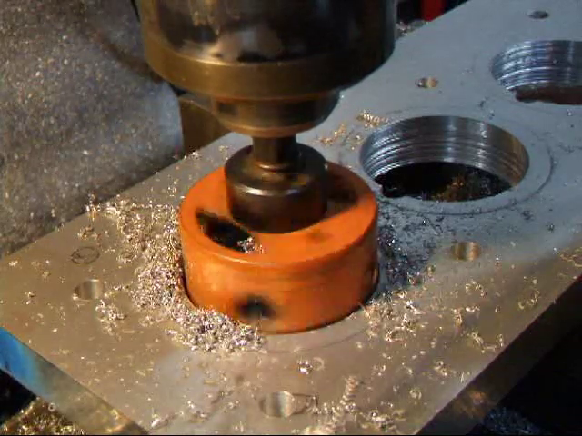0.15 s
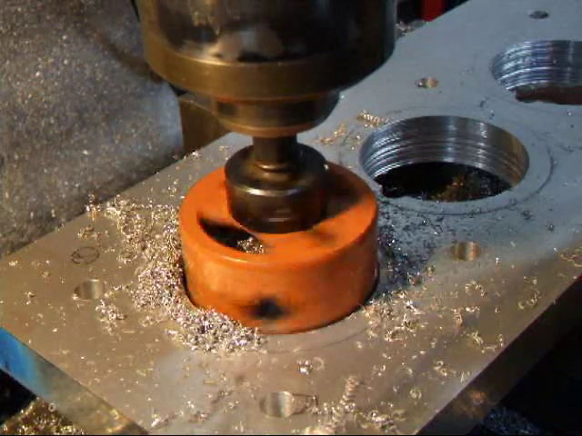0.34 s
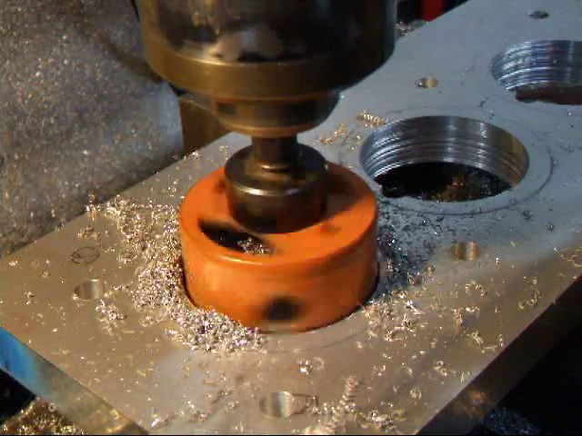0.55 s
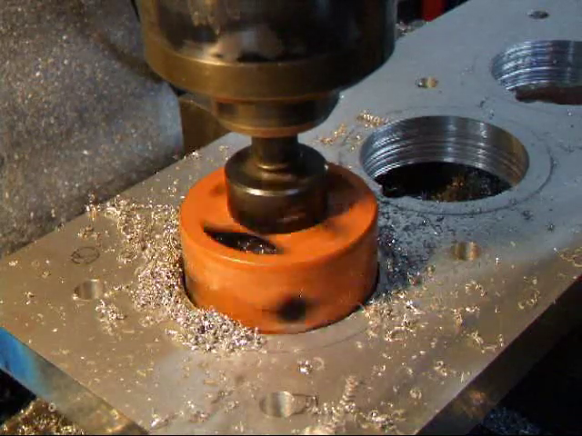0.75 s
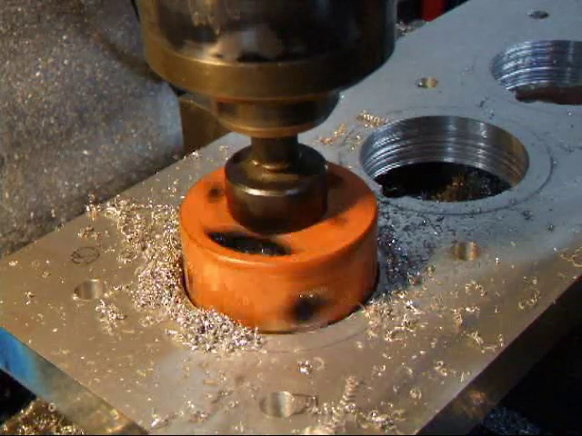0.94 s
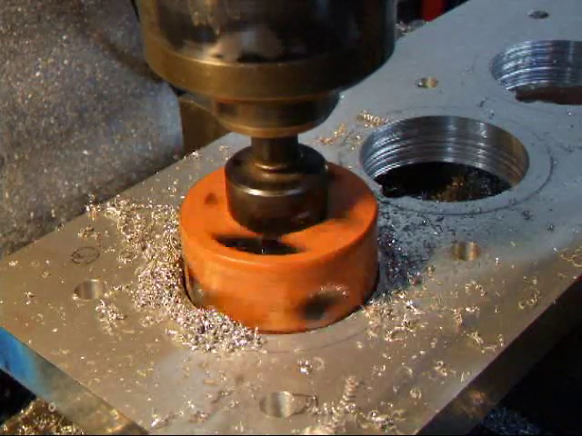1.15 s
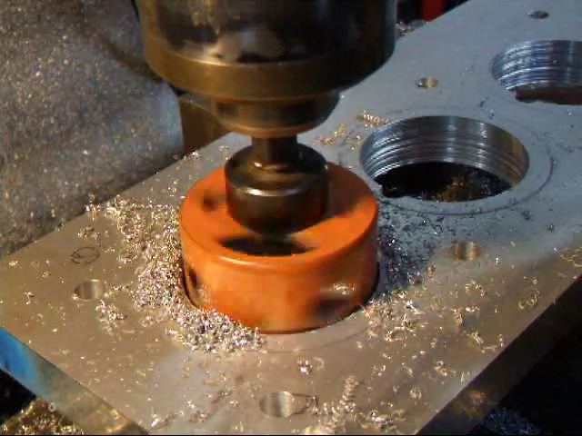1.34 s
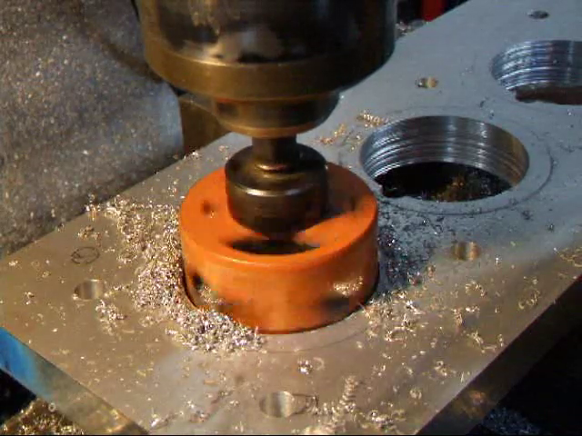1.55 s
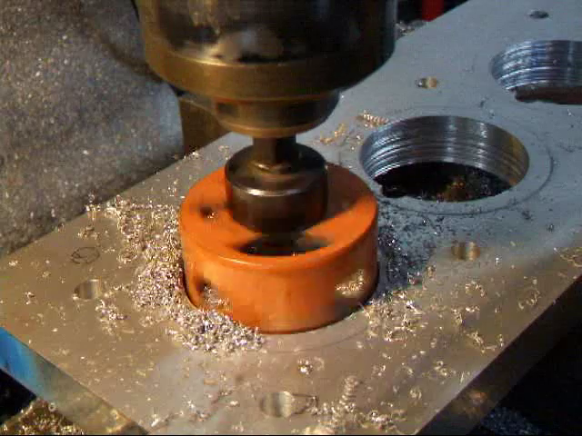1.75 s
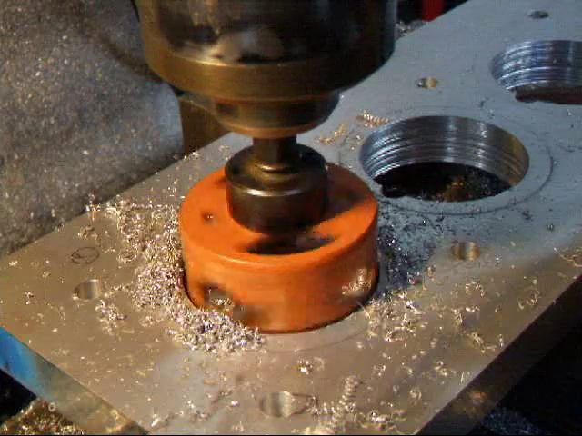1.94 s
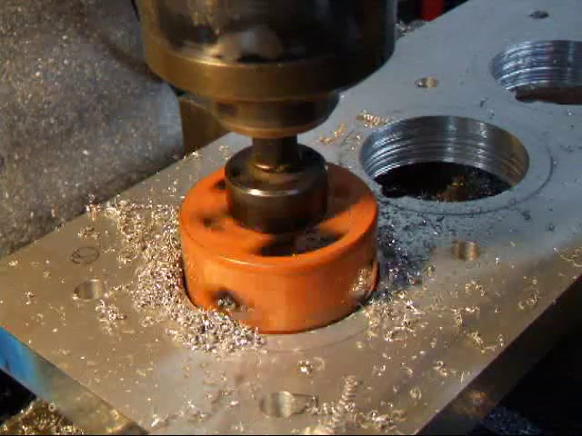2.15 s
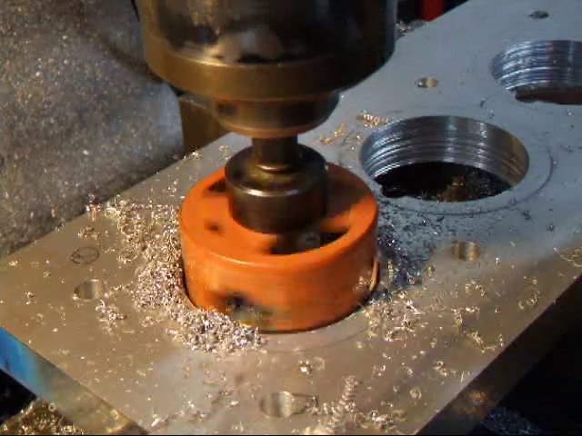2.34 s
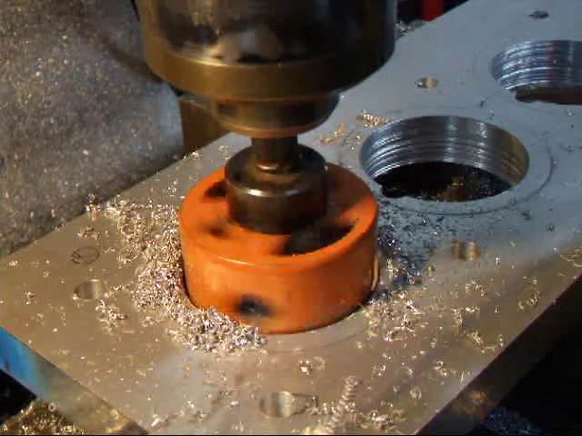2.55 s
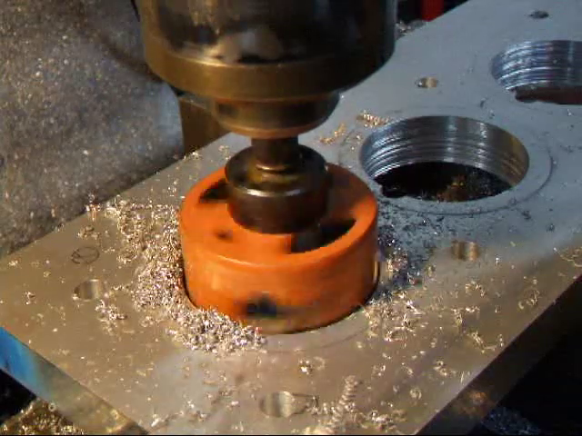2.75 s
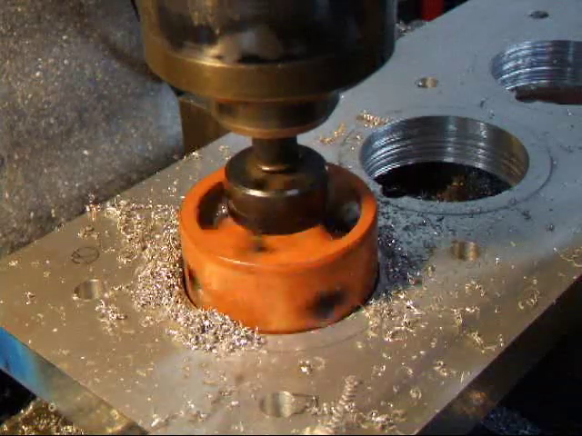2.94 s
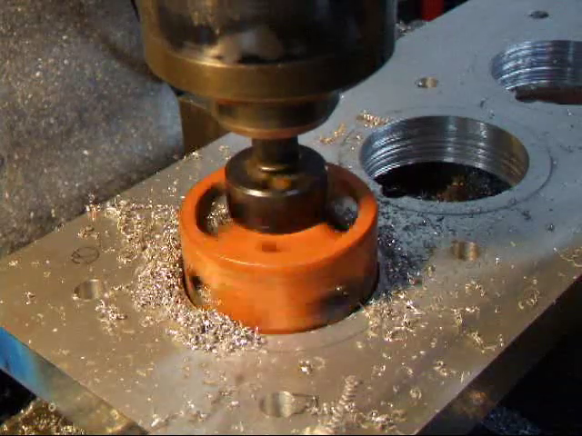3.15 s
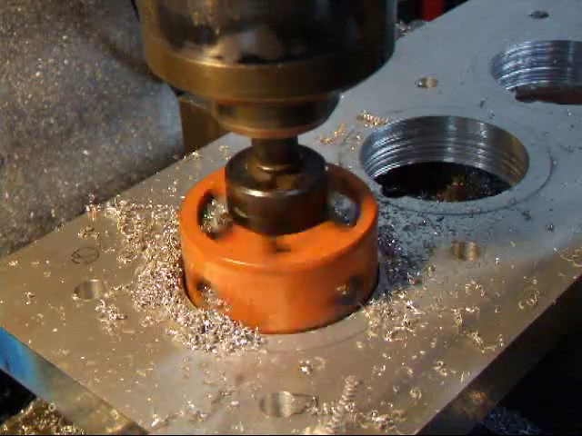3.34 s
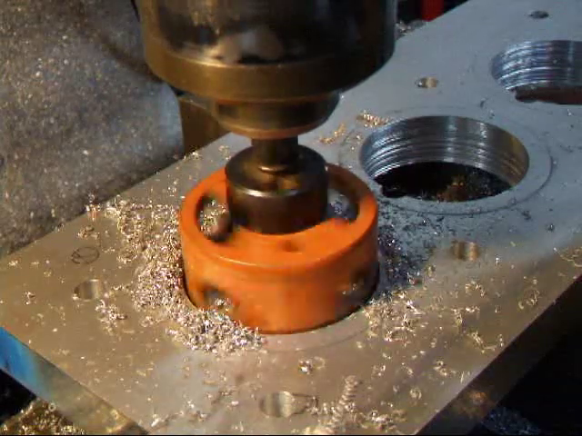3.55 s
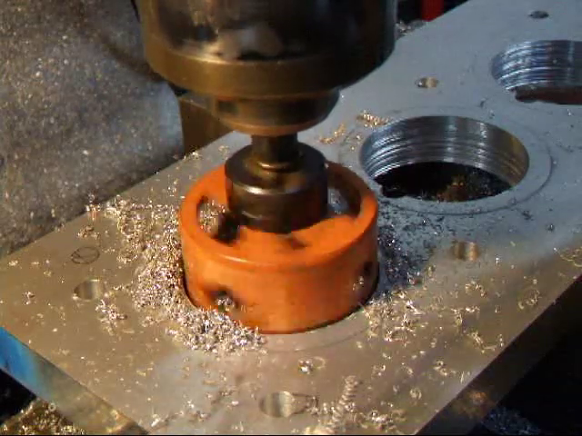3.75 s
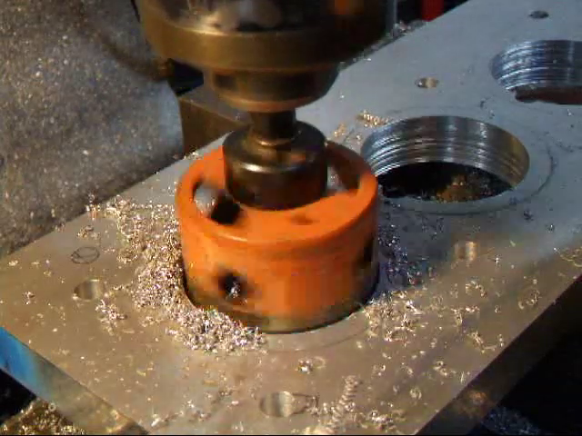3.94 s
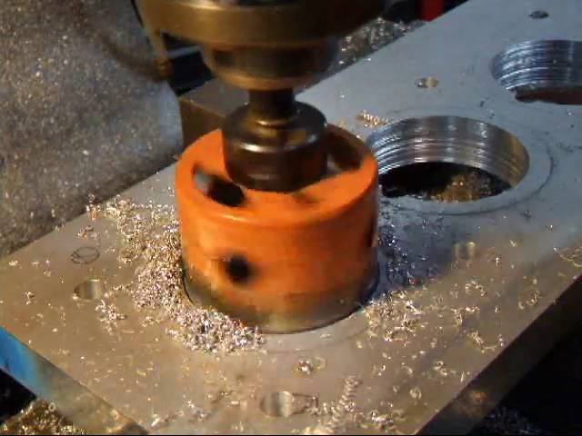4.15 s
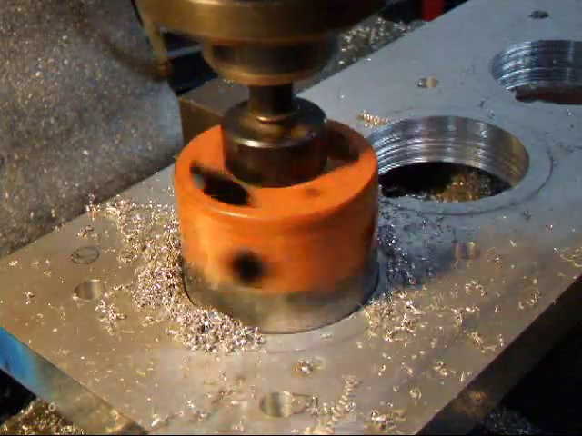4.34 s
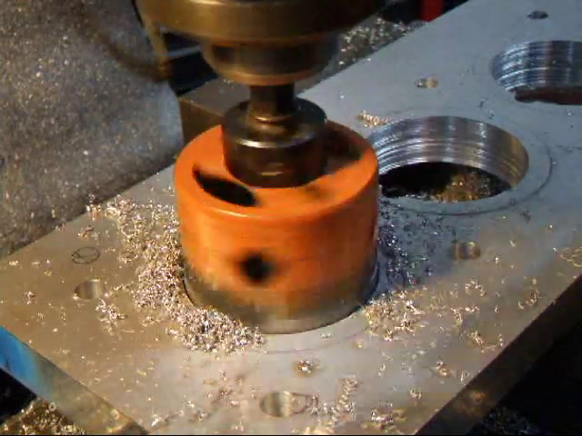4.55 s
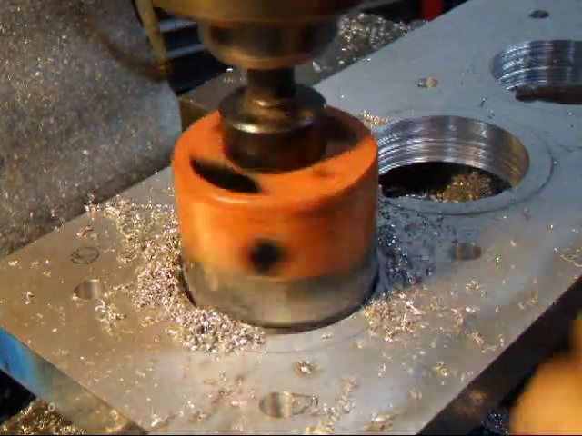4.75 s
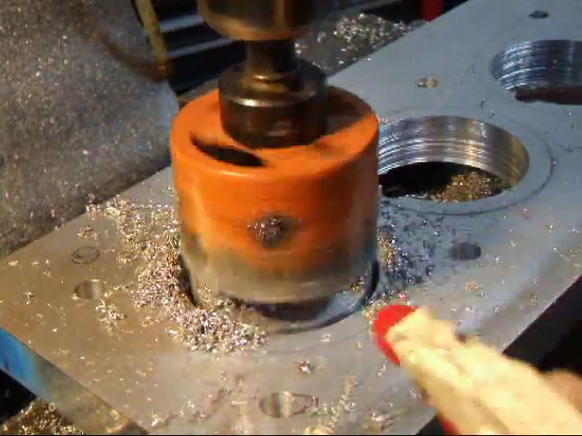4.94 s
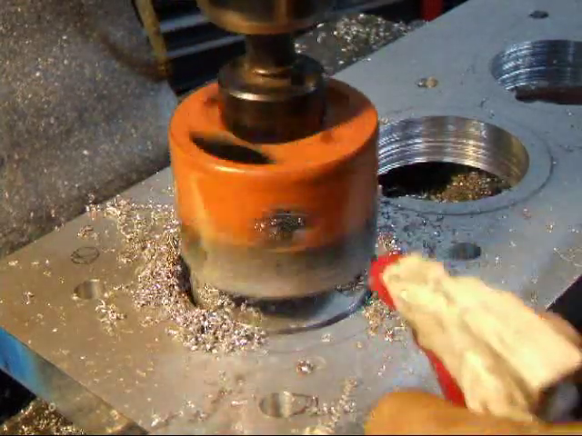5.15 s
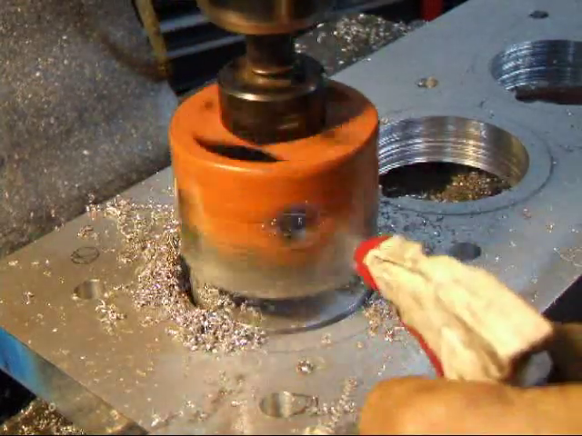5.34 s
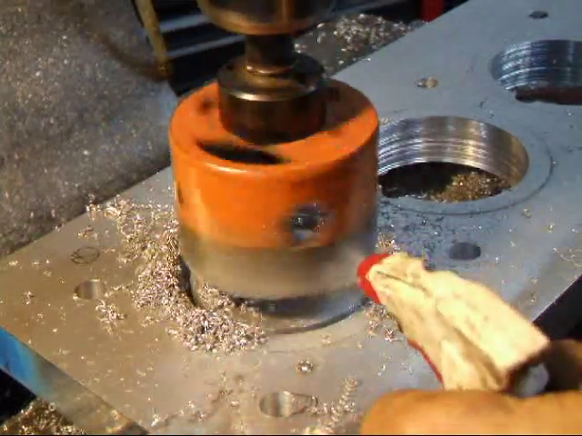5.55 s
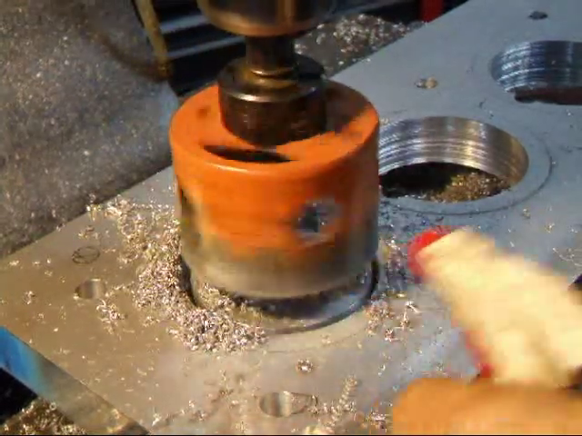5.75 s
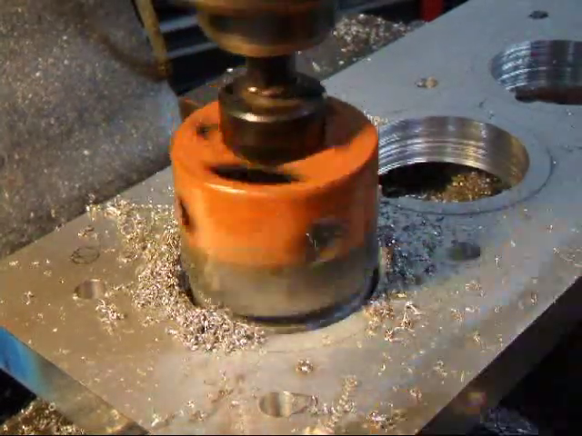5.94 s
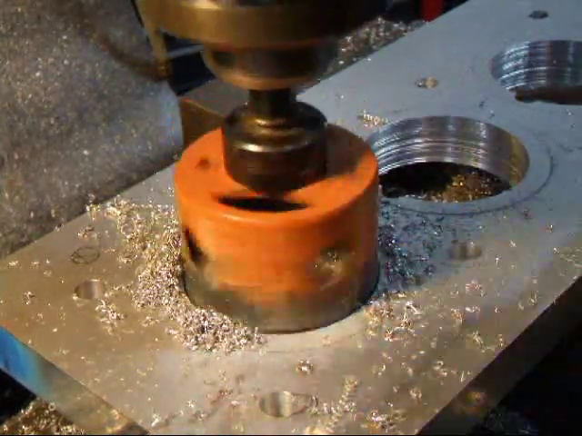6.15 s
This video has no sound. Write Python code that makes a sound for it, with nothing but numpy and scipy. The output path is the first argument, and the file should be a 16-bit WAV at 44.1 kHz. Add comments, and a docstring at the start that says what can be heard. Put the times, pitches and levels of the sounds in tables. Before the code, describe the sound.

A hole saw on a milling machine cuts metal plate, heard close and nearly dry in a workshop. From 0 to about 3.8 seconds the teeth catch in separate bites, at roughly 0.1, 0.5, 0.9, 1.3, 1.7, 2.2, 2.6, 3.0 and 3.4, with a weak last one near 3.7. Each starts abruptly as a loud, raspy buzz around 430 pulses a second with bright steel ringing, then turns ragged and grinding, rising slightly in pitch as it lets go into a short hum. The bite at 1.3 is rougher, growling, with a brief squawk and chip snag near 1.45. After 3.75 the saw lifts; hard clinks come at 4.1, 4.2 and 4.45, with faint squeaks around them. The drive's whine, throbbing about eleven times a second over a coloured rattle, swells and continues alone, with one more light clink near 6.2.

```python
"""A hole saw on a milling machine cuts thick steel plate, close by in a workshop. Its teeth bite again
and again, and the cup chatters by stick-slip some 430 times a second: pulses ring its resonances.
Grains of noise make tearing chips and grinding. Then the saw is lifted and clinks and squeaks in its
groove, while the recorder's gain recovers and brings up the drive: whining tones that throb with the
shaft, over a coloured rattle."""
import sys
import numpy as np
from scipy import signal
from scipy.fft import rfft, irfft, next_fast_len
from scipy.io import wavfile
from scipy.ndimage import uniform_filter1d, minimum_filter1d

SR = 44100
rng = np.random.default_rng(int(sys.argv[2]) if len(sys.argv) > 2 else 0)


def persist_wave(psi):
    """Save psi, clipped to +-1, as 16-bit WAV."""
    counts = np.round(np.clip(psi, -1, 1) * 32767).astype(np.int16)
    wavfile.write(sys.argv[1], SR, np.atleast_2d(counts).T)


N = 273861
TIME = np.arange(N) / SR  # seconds

# All levels in the tables are relative, ahead of the gains of the mix.
# Rattle and rumble spectrum of the drive. Each row: frequency in Hz, level in dB.
DRIVE_SPECTRUM = [(20, -13), (50, -21), (105, 0), (160, -2), (205, -9), (250, 0.5), (450, -2), (620, 6.5),
                  (870, 0), (1080, 4.5), (1600, -5.5), (2300, -9.5), (4000, -14), (5400, -12.5),
                  (11000, -23)]
# Tones of gears and motor. Each row: frequency in Hz, level in dB, depth of flutter at twice the
# shaft rate as a share.
GEAR_TONES = [(99.8, -44, 0.25), (261.4, -50.5, 0.1), (372.3, -39, 0.29), (502, -43.5, 0.1),
              (590, -33.5, 0.5), (647, -39.5, 1), (824, -43.5, 0.039), (925, -50, 0.25),
              (1098, -39.5, 0.86), (1510, -56, 0.1), (2405, -49.5, 0.19), (3069, -50.5, 0.19),
              (3800, -50, .5), (4770, -49.5, 0.42), (5330, -48.5, 0.53), (6481, -60, 0.35)]
WHINE_HZ, WHINE_DB = 729, -27
SHAFT_HZ = 11.08

# The rim touches the wall of the groove. Each row: time in seconds, level in dB, length in seconds,
# share of hard knock from 0 to 1.
RIM_TOUCHES = [(2.875, -27, .025, .05), (3.255, -29, .015, .05), (4.120, -20.5, .003, .95),
               (4.211, -16.5, .006, .78), (4.39, -36, .025, .2), (4.463, -24, .004, .75),
               (4.49, -40, .02, .1), (4.58, -37, .03, .25), (4.72, -43, .02, .1), (4.795, -35, .025, .15),
               (6.198, -26, .008, .6)]
# Resonances of the freed cup. Each row: frequency in Hz, width in Hz, lift in dB.
FREE_CUP_MODES = [(1680, 260, 14), (2130, 220, 11), (2600, 150, 7), (3050, 150, 5), (5450, 300, 4)]
# Squeak of the rim. Each row: frequency in Hz, width in Hz, level in dB.
RIM_SQUEAK = [(5700, 200, -10), (7560, 157, -9.5), (8360, 330, -8)]

# The teeth bite. Each row: start in seconds, hold in seconds, force in dB, sag over the hold in dB,
# release in dB per second, swing of the cup in dB, chatter pitch in Hz, time in which the regular beat
# loosens in seconds, share by which slips alternate between strong and weak.
TOOTH_BITES = [ (0.120, .160, -19, 9, 262.5, -24.5, 429, 0.054, 0.13),
               (0.487, .12, -21, 2, 105, -24, 418.4, 0.098, 0.04),
               (0.91, 0.4, -19.5, 6, 156, -25, 432.5, 0.13, 0.039),
               (1.304, .140, -22.5, 0.34, 135, -25, 432.5, 0.18, 0.93),
               (1.718, 0.27, -19.5, 6, 421.5, -25.5, 423.6, 0.19, 0.052),
               (2.162, 0.2, -18, 8.5, 191.5, -23.5, 426.9, 0.11, 0.041),
               (2.575, .250, -19, 7, 129.5, -25.5, 428.7, .14, 0.065),
               (2.980, .250, -18, 9, 140.5, -25, 430, .14, 0.055),
               (3.405, 0.17, -20, 3.5, 200.5, -28, 431.3, 0.16, 0.048),
               (3.66, 0.057, -27, 3, 173, -27, 451.6, .01, .3), ]
# Resonances of the steel cup in the cut. Each row: frequency in Hz, width in Hz, lift in dB.
CUP_MODES = [(1106, 15, 13), (1352.4, 58, 14.5), (1720, 49, 6), (2600, 190, 6), (3070, 270, 10),
             (4000, 52, 4), (4790, 130, 2), (5100, 260, 8.5), (6660, 65, 9), (9160, 120, 8)]
# Spectrum of the slips. Each row: frequency in Hz, level in dB.
SLIP_SPECTRUM = [(300, -47.5), (620, -13.5), (860, 6), (1100, -3.5), (1350, -3), (2000, -9.5), (3700, -8.5),
                 (6500, -7), (9000, -11.5), (11000, -14)]
# Spectrum of chip scraping. Each row: frequency in Hz, level in dB.
SCRAPE_SPECTRUM = [(200, -51), (380, 3.5), (620, -12), (900, -11), (1700, 6), (2300, -0.5), (4400, -1),
                   (6600, 0.5), (9300, -5), (11000, -9.5)]
# Spectrum of grinding. Each row: frequency in Hz, level in dB.
GRIND_SPECTRUM = [(300, -21.5), (650, -35), (800, 8.5), (920, 15), (1100, 4.5), (1220, 6.5), (1400, 1),
                  (1550, 2.5), (2200, -42.5)]
# Spectrum of the plate shuddering under a loose, ragged cut. Each row: frequency in Hz, level in dB.
SHUDDER_SPECTRUM = [(60, -7), (140, -6.5), (220, 5.5), (330, -4.5), (600, -1), (1500, -59)]
# Rumble of the machine under load. Each row: frequency in Hz, level in dB.
LOAD_SPECTRUM = [(20, -5), (50, -18), (100, -0.5), (135, -5), (300, -35), (1000, -50)]
# Partials of the limping swing. Each row: multiple of the pitch, level in dB.
HALF_PARTIALS = [(1.5, -11), (2.5, 0), (3.5, -7), (4.5, -3), (5.5, -11), (6.5, -8), (7.5, -10)]
# A trapped chip is dragged through the groove. Each row: time in seconds, level in dB, length in seconds.
CHIP_SNAGS = [(1.442, -20.5, 0.0034), (1.555, -35.5, 0.013), (2.806, -36, 0.011), (2.833, -25, 0.0048),
              (3.103, -24, .005), (3.241, -26.5, 0.0055), (3.674, -37, 0.011), (3.719, -27, 0.0082)]
# Released by the teeth, the cup swells into a hum. Each row: time in seconds, level in dB,
# length in seconds.
CUP_HUMS = [(.325, -28.5, 0.033), (.76, -33, 0.064), (1.577, -27, 0.029), (2.019, -28, 0.021),
            (2.415, -25, .03), (2.901, -26, 0.031), (3.271, -22, 0.029), (3.725, -27, 0.016)]
# The rim squawks as a bite lets go. One row: time in seconds, frequency in Hz, level in dB,
# length in seconds.
RIM_SQUAWK = (1.463, 1540, -22.5, .013)

FORCE_ATTACK_DB_PER_S = 1499.5  # the teeth catch at once
SWING_ATTACK_DB_PER_S = 419  # the cup needs longer to build up its swing
SWING_FOLLOW = 1.05  # dB of swing lost for each dB of force lost
FREE_HZ, GRIP_RANGE_DB = 477.7, 23  # the pitch climbs to that of the free cup as the force falls so far
IDLE_FORCE_DB, IDLE_SWING_DB = -41.5, -39.5  # the teeth skim the plate between bites
LIFT_S, LIFT_DB_PER_S = 3.753, 84.5  # the saw is raised and the contact fades


def gain_of(db):
    """Level law: decibels to amplitude."""
    return 10 ** (np.asarray(db) / 20)


def evened(x):
    """Power normalisation: scales to rms 1."""
    return x / np.sqrt(np.mean(x ** 2) + 1e-20)


def wander(hz):
    """Low-passed noise: a random drift of rms 1, no faster than about hz."""
    step = 32  # samples between drawn points
    size = next_fast_len(N // step + 2)
    f = np.fft.rfftfreq(size, step / SR)
    drift = irfft(rfft(rng.standard_normal(size)) / (1 + (f / hz) ** 4), size)
    return evened(np.interp(np.arange(N) / step, np.arange(size), drift))


def bump(at, length):
    """Gaussian envelope: swells to 1 at a moment, falling to 1/e a length away."""
    return np.exp(-((TIME - at) / length) ** 2)


def colour(x, points, peaks=(), size=4096):
    """Minimum-phase filter: a smooth spectrum with resonances standing on it; rms 1."""
    hz = np.fft.rfftfreq(size, 1 / SR)
    f, db = np.transpose(points)
    db = np.interp(np.log(hz + 1), np.log(f), db)
    for centre, width, lift in peaks:
        db = db + lift / (1 + (2 * (hz - centre) / width) ** 2)
    log_gain = np.log(gain_of(np.r_[db, db[-2:0:-1]]))
    # the phase of a causal response is the Hilbert transform of its log gain
    response = np.fft.ifft(np.exp(signal.hilbert(log_gain).conj())).real
    return evened(signal.oaconvolve(x, response)[:N])


def grains(per_s, spread_db):
    """Shot noise: random tiny impacts, a few much larger than the rest when the spread is wide."""
    size = gain_of(spread_db * np.minimum(rng.exponential(1, N), 4))
    sign = rng.choice([-1, 1], N)
    struck = rng.random(N) < per_s / SR
    return evened(size * sign * struck)


def workshop(x, t60, wet_db):
    """Early reverberation: a short, faint tail, different at each ear except in the bass."""
    t = np.arange(SR // 2) / SR
    sparse = rng.standard_normal((2, len(t))) * (rng.random((2, len(t))) < .06)
    taps = sparse * gain_of(-60 * t / t60) * (t > .002)
    taps = signal.lfilter(*signal.butter(1, 700, "high", fs=SR), taps)
    tail = taps / np.linalg.norm(taps, axis=1, keepdims=True)
    return x + gain_of(wet_db) * signal.fftconvolve(x[None], tail, axes=1)[:, :N]


def far_rattle(far_db=-44):
    """Diffuse field: the drive's rattle returns from the far walls, independent at each ear."""
    return gain_of(far_db) * np.array([colour(rng.standard_normal(N), DRIVE_SPECTRUM) for ear in "LR"])


def drive(rattle_db=-23.5, throb_db=0.3, flutter_db=-1.3):
    """Amplitude modulation: a shaft running slightly off centre makes whine, gears and rattle throb."""
    shaft = 2 * np.pi * SHAFT_HZ * (TIME - .006)
    throb, twice = np.cos(shaft), np.cos(2 * shaft)
    mesh = np.sin(2 * np.pi * WHINE_HZ * TIME + .2 * wander(7))
    whine = gain_of(WHINE_DB) * evened(mesh * (1 + .9 * throb + .3 * twice + .1 * wander(20)))
    gears = np.zeros(N)
    for hz, db, depth in GEAR_TONES:
        swell = 1 + depth * twice + .3 * wander(20)
        gears += gain_of(db) * evened(swell * np.sin(2 * np.pi * hz * TIME + 0.63 * wander(8.3)))
    # the rattle peaks twice a turn, the stronger peak a quarter turn ahead of the whine
    clatter = grains(7000, 0.55)
    beat_db = -throb_db * np.sin(shaft) + flutter_db * twice + 1.2 * wander(29)
    rattle = colour(clatter * gain_of(beat_db), DRIVE_SPECTRUM)
    return whine + gears + gain_of(rattle_db) * rattle


def touches():
    """Impact and friction: a hard touch knocks the freed cup's resonances; a light one squeaks."""
    knock_spectrum = [(300, 1), (1400, -9.5), (4000, -8.5), (8000, -14.5), (11000, -20.5)]  # Hz, dB
    knock = colour(grains(7900, 0.61), knock_spectrum, FREE_CUP_MODES)
    squeak = np.zeros(N)
    for hz, width, db in RIM_SQUEAK:
        squeak += gain_of(db) * wander(width / 2) * np.sin(2 * np.pi * hz * TIME)
    squeak = evened(squeak)
    out = np.zeros(N)
    for at, db, length, hard in RIM_TOUCHES:
        hard = np.clip(hard, 0, 1)
        out += gain_of(db) * bump(at, length) * evened(hard * knock + (1 - hard) * squeak)
    return out


def bite_db(start, hold, sag_db, release, attack):
    """Envelope of one bite below its peak, in dB: a quick attack, a sagging hold, a release."""
    t = TIME - start
    sag = sag_db * np.clip(t / hold, 0, 1)
    return attack * np.minimum(t, 0) - sag - release * np.maximum(t - hold, 0)


def feed():
    """Contact loading of teeth and cup: the harder the grip, the lower the chatter pitch."""
    contact_db = -LIFT_DB_PER_S * np.maximum(TIME - LIFT_S, 0)
    force_db, sway_db = IDLE_FORCE_DB + contact_db, IDLE_SWING_DB + contact_db
    drop_hz = np.zeros(N)
    for start, hold, peak_db, sag_db, release, swing_db, hz, _, _ in TOOTH_BITES:
        grip_db = bite_db(start, hold, sag_db, release, FORCE_ATTACK_DB_PER_S)
        swing_shape_db = bite_db(start, hold, sag_db, release, SWING_ATTACK_DB_PER_S)
        force_db = np.maximum(force_db, peak_db + grip_db)
        sway_db = np.maximum(sway_db, swing_db + SWING_FOLLOW * swing_shape_db)
        drop_hz = np.maximum(drop_hz, (FREE_HZ - hz) * np.clip(1 + grip_db / GRIP_RANGE_DB, 0, 1))
    force = gain_of(uniform_filter1d(force_db, size=220))
    hums = sum(gain_of(db) * bump(at, length) for at, db, length in CUP_HUMS)
    return force, np.hypot(gain_of(sway_db), hums), FREE_HZ - drop_hz, gain_of(contact_db)


def regularity():
    """Phase locking: each bite starts a regular beat that loosens; limp is its strong-weak alternation."""
    locks = []
    for at, *_, loosen, _ in TOOTH_BITES:
        locks.append((TIME > at) * bump(at, loosen))
    lock = np.max(locks, axis=0)
    limp = np.array([row[-1] for row in TOOTH_BITES]) @ np.array(locks)
    return lock, np.clip(limp + .3 * (1 - lock), 0, 1)


def load_rumble(contact, loose):
    """Forced vibration: the machine under load adds a low rumble, scaled by contact and looseness."""
    return colour(rng.standard_normal(N), LOAD_SPECTRUM) * contact * loose


def shuddering(groove, limp, loose):
    """Forced plate vibration: a loose, ragged cut shakes the plate in its low range."""
    return colour(grains(3000, 2.5), SHUDDER_SPECTRUM) * groove * limp * loose ** .5


def chip_spurts(turns, loose, clump_db=1.5):
    """Modulated tearing: chips spurt after each slip, and come in clumps as teeth catch."""
    return (3.0 + np.exp(-(turns % 1) / 1.8)) * gain_of(clump_db * loose * wander(70))


def grinding(spurts, groove, lock):
    """Resonant excitation: grinding grains drive the cup's modes, weaker while the beat is regular."""
    return colour(grains(3000, 2.5) * spurts, GRIND_SPECTRUM, CUP_MODES) * groove * (1 - .8 * lock)


def chip_scraping(spurts, force, lock, contact, rub_db=-42):
    """Fracture and friction: chips tear, snag and rub the wall, weakly ringing the cup's modes."""
    half_lifted = [(hz, width, .5 * lift) for hz, width, lift in CUP_MODES]
    scrape = colour(grains(6000, 3.2) * spurts, SCRAPE_SPECTRUM, half_lifted)
    tearing = force * (1 - .5 * lock)
    rub = gain_of(rub_db) * contact  # the wall still rubs between bites, until the saw is lifted
    snags = sum(gain_of(db) * bump(at, length) for at, db, length in CHIP_SNAGS)
    return scrape * (np.hypot(tearing, rub) + snags)


def squawk():
    """Friction-driven tone: the rim squawks briefly at an unsteady pitch."""
    at, hz, db, length = RIM_SQUAWK
    tone = evened(np.sin(2 * np.pi * hz * TIME + 0.82 * wander(60)))
    return gain_of(db) * bump(at, length) * tone


def ringing(force, lock):
    """Resonance: while the beat is regular it pumps the cup's high modes, which sing out."""
    ring = np.zeros(N)
    for hz, width, lift in CUP_MODES[3:-1]:
        swell = 1 + .5 * wander(40)
        tone = np.sin(2 * np.pi * hz * TIME + 1.7 * wander(width / 3))
        ring += gain_of(lift) * swell * tone
    return evened(ring) * force * lock


def growl(turns, force, limp, loose):
    """Period doubling: alternating strong and weak swings put growling partials in between."""
    halves = np.zeros(N)
    for multiple, db in HALF_PARTIALS:
        halves += gain_of(db) * np.sin(2 * np.pi * multiple * turns + (.6 + loose) * wander(30))
    return evened(halves) * force * limp


def swing_overtones(turns, force, lock):
    """Harmonic distortion: the lopsided swing has second and third partials."""
    second = np.sin(4 * np.pi * turns) * (1 + .6 * wander(45))
    third = .85 * np.sin(6 * np.pi * turns) * (1 + .7 * wander(40))
    return evened(second + third) * force * (.8 + .2 * lock)


def swinging(turns, sway, loose):
    """Torsional oscillation: the cup twists to and fro, less steadily in a loose cut."""
    return evened(np.sin(2 * np.pi * turns) * (1 + (.14 + .32 * loose) * wander(45))) * sway


def disperse(x, delay):
    """Dispersion: bending waves in steel run faster when high; clicks smear, by delay seconds at 1 kHz."""
    khz = np.fft.rfftfreq(N, 1 / SR) / 10 ** 3
    return irfft(rfft(x) * np.exp(-4j * np.pi * delay * 10 ** 3 * np.sqrt(khz)), N)


def slip_train(turns, loose, limp, uneven=0.35):
    """Stick-slip: one slip a swing, of uneven strength; a loose cut makes them early and late."""
    at = np.flatnonzero(np.diff(np.floor(turns)))
    late, size = rng.standard_normal((N, 2))[:len(at)].T
    late = late * (.015 + .2 * loose[at] ** 2) / 1000  # milliseconds to seconds
    weak = np.arange(len(at)) % 2  # every second slip
    moment = np.clip(at + np.round(late * SR).astype(int), 0, N - 1)
    slips = np.zeros(N)
    slips[moment] = np.exp(uneven * size) * (1 + limp[at] * (1 - 2 * weak))
    return disperse(slips, delay=.004)


def slipping(turns, force, lock, limp):
    """Impulse response: each slip of the teeth rings the resonances of the cup."""
    pulses = slip_train(turns, 1 - lock, limp)
    return colour(pulses, SLIP_SPECTRUM, CUP_MODES) * force * (.55 + .45 * lock)


def cutting():
    """Stick-slip chatter: the cup twists to and fro; each swing ends in a slip and tears off chips."""
    force, sway, pitch_hz, contact = feed()
    lock, limp = regularity()
    loose = 1 - lock
    groove = force ** 0.77  # grinding and shudder follow the force less than fully
    jitter = (.006 + .024 * loose) * wander(70)
    turns = np.cumsum(pitch_hz * (1 + jitter)) / SR  # swings so far
    slips = gain_of(-1) * slipping(turns, force, lock, limp)
    spurts = chip_spurts(turns, loose)
    noise = chip_scraping(spurts, force, lock, contact)
    noise = noise + gain_of(-5) * grinding(spurts, groove, lock)
    noise = noise + gain_of(-19) * shuddering(groove, limp, loose)
    noise = noise + gain_of(-51) * load_rumble(contact, loose)
    tones = gain_of(1) * swinging(turns, sway, loose)
    tones = tones + gain_of(-9) * swing_overtones(turns, force, lock)
    tones = tones + gain_of(-5) * growl(turns, force, limp, loose)
    tones = tones + squawk()
    tones = tones + gain_of(-8) * ringing(force, lock)
    return slips + noise + tones


def scene(drive_db=-2.5, cut_db=17, touch_db=3.0, right_db=0.54):
    """Superposition: the saw, slightly to the right, is far louder than the drive."""
    saw = gain_of(cut_db) * cutting() + gain_of(touch_db) * touches()
    saw = workshop(saw, t60=0.012, wet_db=-13) * gain_of([[-right_db], [right_db]])
    machine = gain_of(drive_db) * workshop(drive(), t60=0.033, wet_db=-17.5)
    return saw + machine + far_rattle()


def record(dry, threshold_db=-20, squeeze=0.84, start_db=15.0, hold=11025, recovery_s=.6):
    """Gain control: ducks fast, holds, recovers slowly; peaks are rounded; then a low-pass."""
    memory = .012 * SR  # samples over which power is averaged
    power = signal.lfilter([1], [1, -np.exp(-1 / memory)], (dry ** 2).mean(0)) / memory
    duck_db = squeeze * np.maximum(10 * np.log10(power + 1e-12) - threshold_db, 0)
    duck_db[0] = start_db  # the cut is already under way
    # greatest ducking over the last hold samples
    held_db = -minimum_filter1d(-duck_db, hold, origin=hold // 2, mode="nearest")
    fade = np.exp(-TIME / recovery_s)
    recovering_db = np.maximum.accumulate(held_db / fade) * fade
    ducked = dry / gain_of(uniform_filter1d(recovering_db, size=200))
    rounded = ducked / (1 + (ducked / .55) ** 4) ** .25
    low_pass = signal.firwin(401, 11400, window=("kaiser", 9), fs=SR)  # cutoff in Hz
    return signal.oaconvolve(rounded, low_pass[None], "same", axes=1)


dry = scene()
out = record(dry)
persist_wave(out)
```